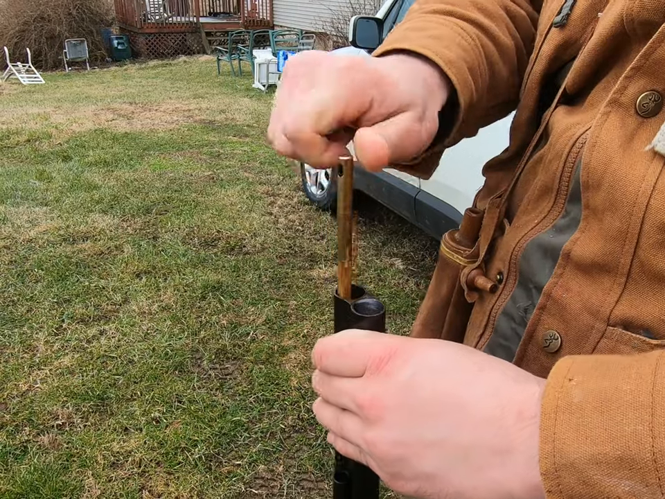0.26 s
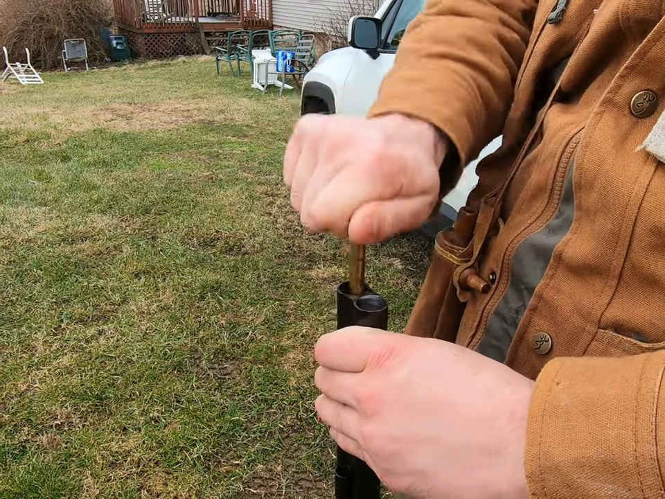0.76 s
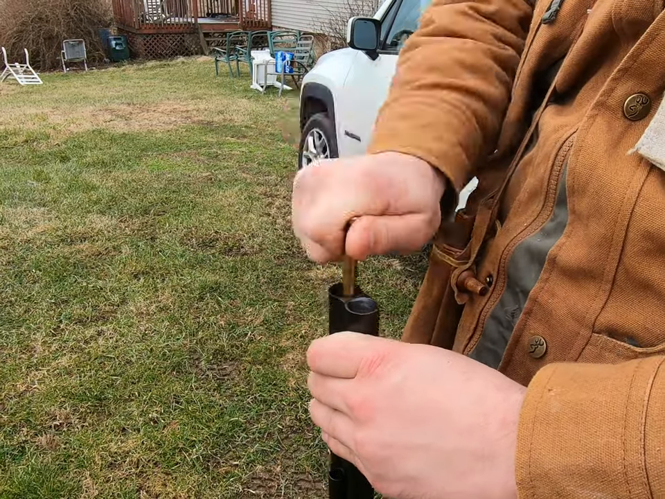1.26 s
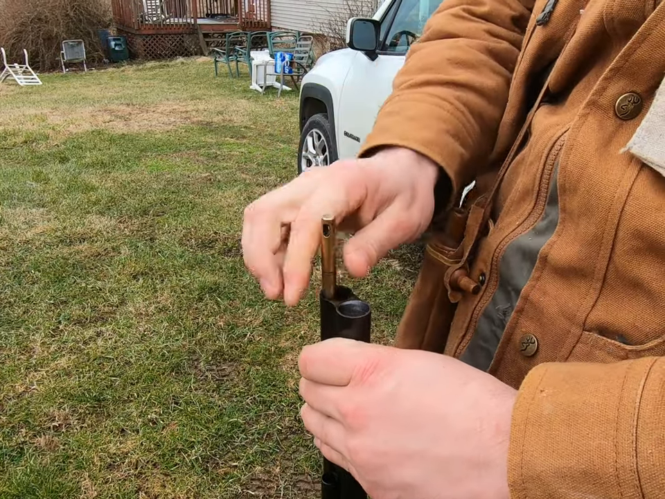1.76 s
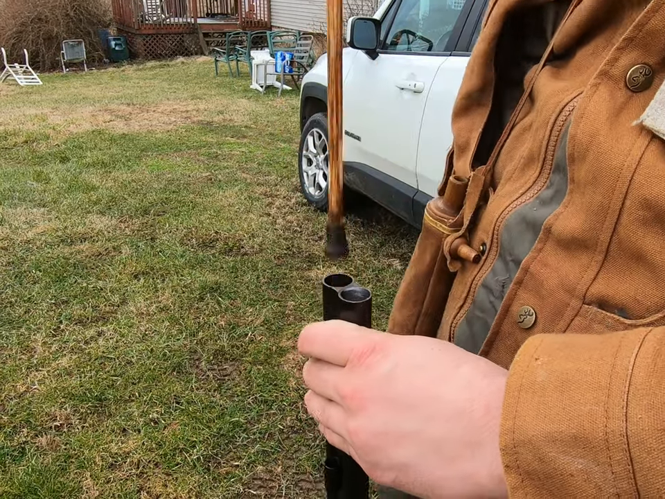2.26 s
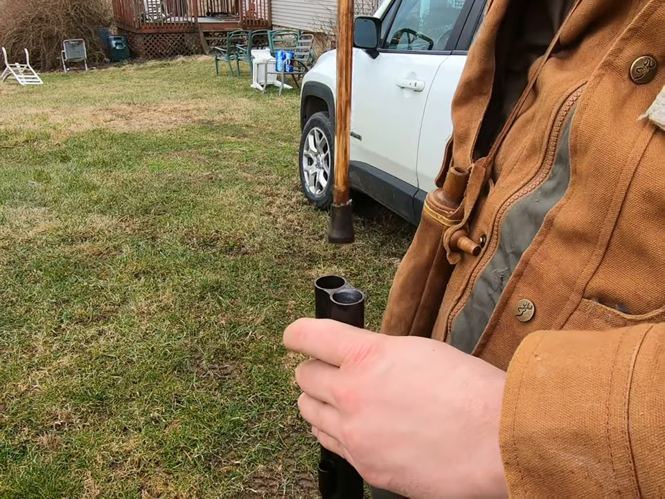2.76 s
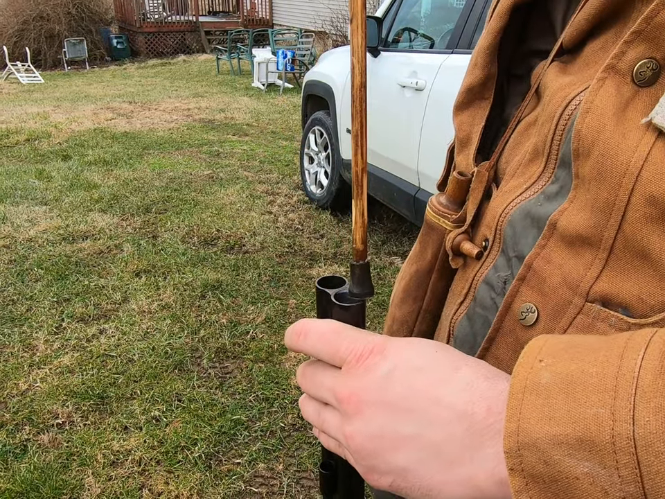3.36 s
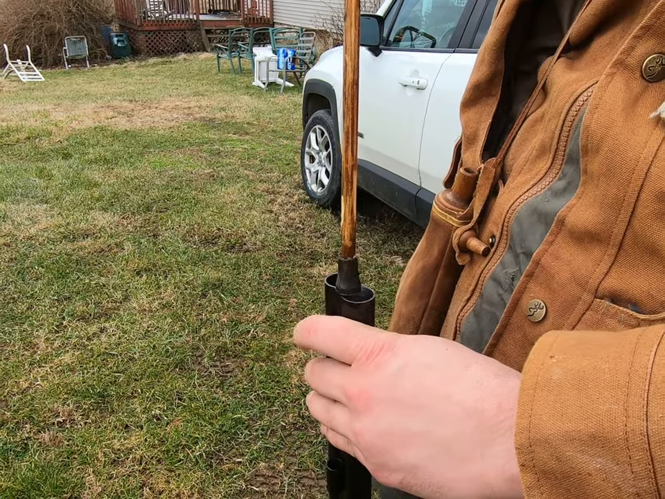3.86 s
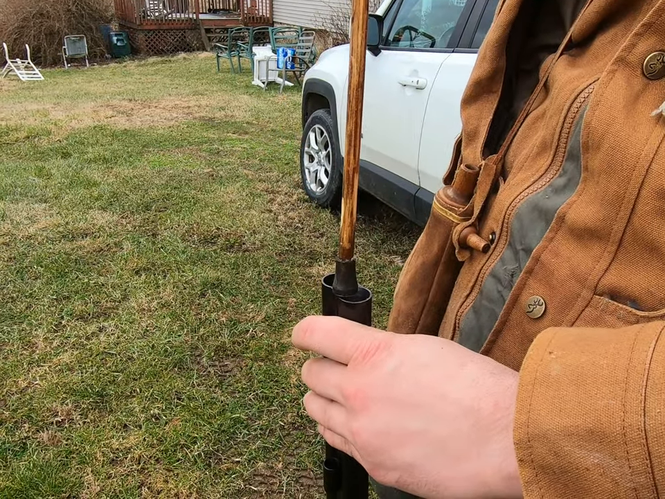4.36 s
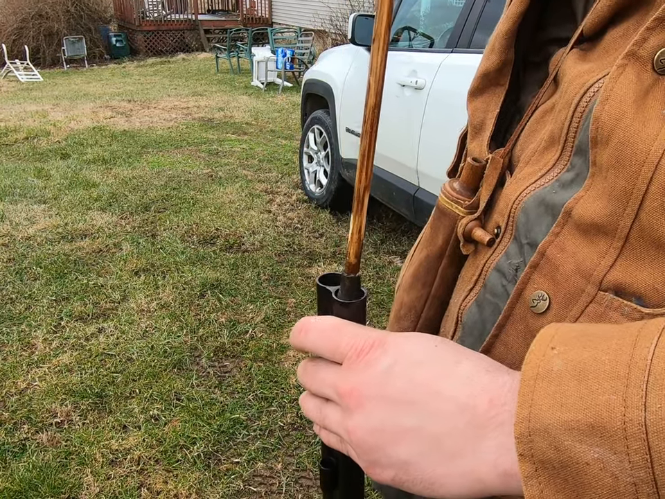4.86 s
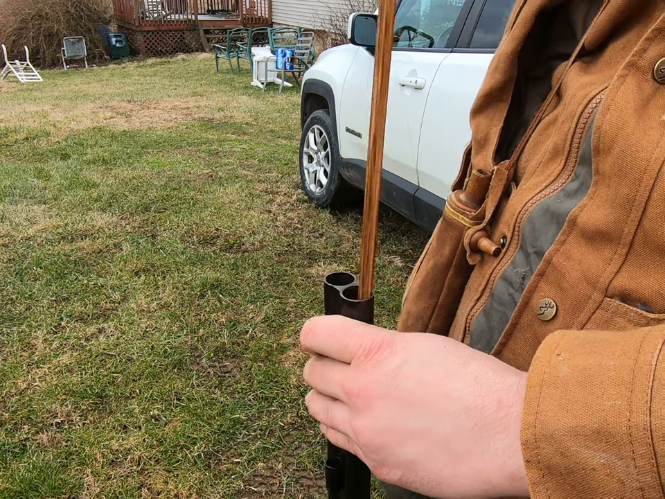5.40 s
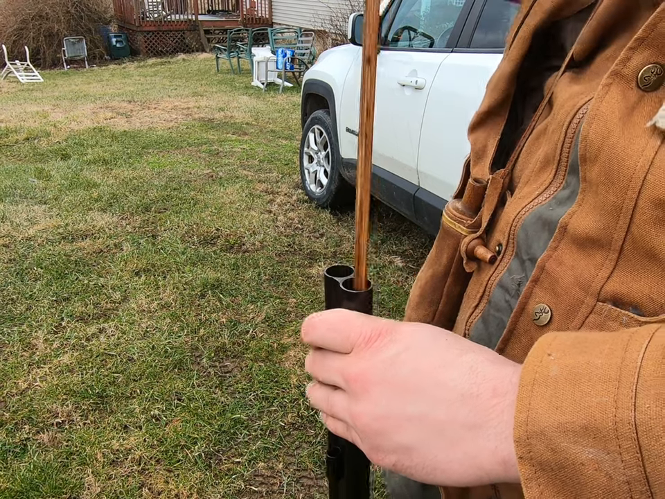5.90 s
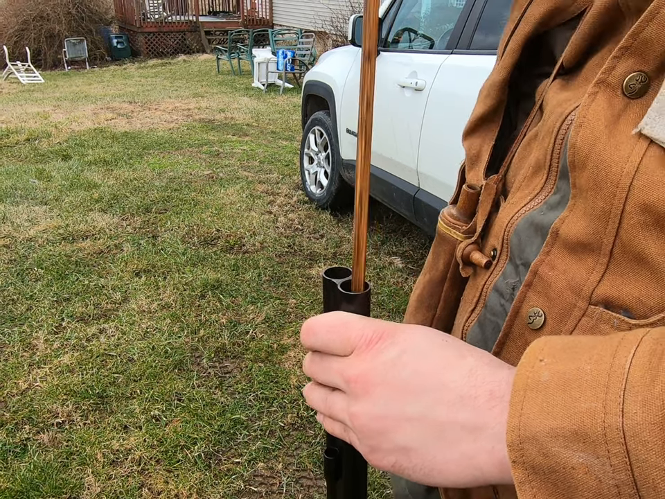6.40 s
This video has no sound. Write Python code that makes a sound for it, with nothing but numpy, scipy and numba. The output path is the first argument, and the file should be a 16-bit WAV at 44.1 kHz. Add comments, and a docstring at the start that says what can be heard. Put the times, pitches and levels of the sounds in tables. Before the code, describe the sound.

A wooden ramrod works inside a steel gun barrel, close to the microphone in a quiet yard. From the start to about 1.7 seconds it rams down in a string of hollow knocks, strongest between 0.8 and 1.4 seconds, with small low gulps of air and sharp clicks of the shaft against the muzzle. From 2 to 2.6 seconds it slides out with a light scrape, a few clicks and a soft canvas sleeve rustle. A quieter stretch follows, with light hollow taps on the rim around 3.4 to 3.9 seconds and again near 4.9. From 5.2 seconds until the end, near 6.7, the rod scrubs quickly up and down the second barrel, rasping, clicking and knocking, with a pipe-like tone that drops on each push and rises on each pull. Faint distant traffic hums underneath, and a small wind puff rumbles around 5 seconds.

```python
"""A wooden ramrod is worked in a double-barrelled muzzle-loader, close by, in a quiet yard.
First it rams the load home in one bore: knocks, gulps of air, the shaft clicking on the muzzle.
It rattles out by 2.6 s, taps the rim from 3.4 s, then scrubs up and down the other bore from 5.2 s.
The air above the rod's head rings as a pipe closed at one end, so its pitch slides with each stroke.
Behind it: a canvas sleeve, far traffic, puffs of wind."""
import sys
import numpy as np
from scipy import signal
from scipy.fft import rfft, irfft, next_fast_len
from scipy.io import wavfile
from scipy.ndimage import uniform_filter1d
from numba import njit

SR = 44100
rng = np.random.default_rng(int(sys.argv[2]) if len(sys.argv) > 2 else 0)


def waveform_to_disk(signal):
    """Save audio, clipped to [-1, 1], as 16-bit WAV at the path in sys.argv[1]."""
    frames = np.transpose(np.atleast_2d(signal))
    scaled = np.clip(frames, -1, 1) * 32767
    samples = np.round(scaled).astype(np.int16)
    wavfile.write(sys.argv[1], SR, samples)


N = 292824
T = np.arange(N) / SR

LOAD_M = .665  # seated load, below the muzzle
# Hand strokes, rest to rest. Each row: start in seconds, end in seconds, target depth in m, rub in dB.
STROKES = [(0.014, 0.149, 0.63, -48.5), (0.112, 0.286, 0.64, -55), (0.744, .88, LOAD_M, -51.5),
           (0.864, 1.06, LOAD_M, -55.5), (1.07, 1.24, LOAD_M, -49.5), (1.33, 1.51, LOAD_M, -53.5),
           (2.042, 2.428, 0.32, -43), (2.41, 2.599, 0.0061, -72), (5.153, 5.23, .021, -41.5),
           (5.19, 5.315, 0.088, -35), (5.34, 5.46, 0.044, -63), (5.462, 5.619, 0.24, -35.5),
           (5.618, 5.749, 0.12, -20), (5.746, 5.888, .33, -35), (5.889, 6.038, .181, -25),
           (6.029, 6.174, .365, -40), (6.159, 6.305, 0.16, -29), (6.31, 6.442, .399, -38),
           (6.435, 6.567, 0.2, -29), (6.582, 6.687, 0.34, -34)]


def knocks(crack_t60_s=.022, stock_t60_s=.037, chatter_db=-13, crack_db=-3, stock_db=-5,
           rebound_s_per_m=.005, rebound_db=-14):
    """Each blow cracks through the wooden stock and shoves the bore's air, which booms in odd harmonics."""
    # Each row: start in seconds, crack in dB, air push in dB, treble in dB, push length in seconds.
    blows = [(.0005, -41.5, -40.5, 5.5, 0.0045), (.0927, -22.5, -28.5, -17, 0.0047),
             (.3864, -32.5, -44.5, 2.5, 0.007), (.8447, -18.5, -31, -3.5, 0.0021),
             (.861, -24.5, -19, -11, 0.0062), (1.1094, -18, -23.5, -4, 0.005),
             (1.3749, -16.5, -25.5, -4, 0.0049), (1.619, -21, -34, 1.5, 0.003),
             (5.5239, -18, -39, -7.5, 0.0022), (5.6317, -25.5, -43, -1, 0.0028),
             (5.652, -31, -51.5, -12, .0023), (5.6854, -54, -82, -15, 0.0017),
             (5.6978, -31, -73, -33, .002), (5.7076, -32, -81, -23, .002), (5.7619, -26.5, -73, -5, 0.0028),
             (5.8065, -31, -56, -2, 0.0021), (5.8444, -30.5, -60, -22, 0.0023),
             (5.9684, -23, -50, -14, 0.002247), (6.0799, -31.5, -52.5, -21, 0.0019),
             (6.2304, -23, -53, -26, 0.00098), (6.245, -22.5, -67, -7, .002),
             (6.2698, -24.5, -73, -0.5, 0.0025), (6.3141, -29, -38.5, -11, 0.0027),
             (6.3579, -30, -50, -14, 0.0048), (6.5161, -22, -43.5, -45, .002),
             (6.615, -21, -33.5, -76, 0.0035)]
    # Crack spectrum. Each row: frequency in Hz, gain in dB.
    crack_eq = [(100, -16.5), (380, -20), (650, -7), (1150, -2), (1800, 2), (2700, 1), (4000, 5.5),
                (5500, -6), (8000, -13.5), (12000, -22), (16000, -43)]
    inside, outside = np.zeros((2, N))
    t = np.arange(4096) / SR
    decays = fade(t, np.array([[crack_t60_s], [stock_t60_s]]))
    for s, db, push_db, treble_db, push_s in blows:
        # a shorter push moves the same air but reaches higher harmonics
        push = np.sin(np.pi * np.minimum(t / push_s, 1)) ** 2 * .004 / push_s
        push = colour(push, [(20, -9), (70, -2.5), (120, 10)])
        forces = (t == 0) + undb(chatter_db) * rng.standard_normal((2, len(t))) * decays
        crack, stock = (brighten(colour(force, crack_eq), treble_db) for force in forces)
        gain = undb(db) / onset_rms(crack)
        add(inside, s, gain * undb(crack_db) * crack + undb(push_db) * push)
        add(outside, s, gain * undb(stock_db) * stock)
        # the head bounces once, later the deeper it is
        rebound = brighten(crack, db=21)
        rebound *= undb(db + crack_db + rebound_db) / onset_rms(rebound)
        add(inside, s + rebound_s_per_m * depth_m(s), rebound)
    return bore(inside, reflection=.9, lowpass=.27) + outside


def taps(trim_db=-1, click_t60_s=.036, contact_s=.0001):
    """The shaft clicks on the muzzle; clear of the bore, the head taps the rim and rings hollower."""
    # Each row: start in seconds, level in dB, treble over middle in dB.
    shaft_taps = [(0.013, -41, -15), (0.177, -30.5, -18), (.254, -44, -15), (.373, -38, -16),
                  (.397, -41, -2), (0.424, -43.5, -11), (.54, -44.5, -50), (.673, -48.5, -21),
                  (.728, -37.5, -27), (0.857, -23.5, 35), (0.883, -25.5, -1), (0.935, -36, -6),
                  (1.038, -27, -6.5), (1.047, -39.5, -3.5), (1.056, -29.5, -8), (1.185, -29.5, -1),
                  (1.194, -31, -15), (1.249, -42, -1), (1.284, -32, -14), (1.29, -49, 3.5),
                  (1.406, -27.5, 8.5), (1.445, -29.5, -11), (1.484, -41, 4), (1.526, -32.5, 3),
                  (1.647, -35.5, 4), (1.698, -51, 16), (1.787, -39.5, -2.5), (1.83, -47.5, -9),
                  (1.903, -41.5, 1), (1.946, -39.5, -1.5), (2.056, -44.5, -15), (2.086, -28.5, -4),
                  (2.278, -31.5, -4), (2.356, -30, -4.5), (5.437, -32.5, 0), (6.333, -24.5, -11.5),
                  (6.549, -32, 11)]
    # Each row: start in seconds, level in dB, treble over middle in dB, an unused value.
    rim_taps = [(3.379, -43.5, -24.5, 3100), (3.671, -28.5, -13, 2100), (3.85, -44.5, -30, 2200),
                (3.97, -58.5, -25.5, 2800), (4.063, -66.5, -3, 4500), (4.801, -39.5, -19.5, 2970),
                (4.884, -46.5, -19, 1000), (4.92, -30, -27, 1000)]
    # Click spectrum. Each row: frequency in Hz, gain in dB.
    click_eq = [(200, -15), (600, -17), (1200, -7.5), (2500, -2.5), (4200, 1.5), (6000, -12.5), (8500, -9),
                (12000, -24.5), (16000, -42.5)]
    # Hollow tone of the free rod, shared by all rim taps. Each row: frequency in Hz, gain in dB.
    free_rod_eq = [(400, -3), (720, 9), (1050, 7), (2200, 3), (4200, 2.5), (8000, -2.5), (12000, -2)]
    out, t = np.zeros(N), np.arange(6000) / SR

    def strike(treble_db):
        """One contact: a dry tick and a short ring."""
        click = colour(rng.standard_normal(len(t)) * fade(t, click_t60_s), click_eq)
        hit = (shaft_ring() + unit(click)) * (1 - np.exp(-t / contact_s))
        shelf_db = max(.61 * (treble_db + 9), -9)
        return brighten(hit, shelf_db, low_hz=4200, high_hz=7500)

    for s, db, treble_db in shaft_taps + rattle():
        hit = strike(treble_db)
        add(out, s, undb(db + trim_db) * hit / onset_rms(hit))
    for s, db, treble_db, _ in rim_taps:
        hit = colour(strike(treble_db), free_rod_eq)
        add(out, s, undb(db + trim_db) * hit / onset_rms(hit))
    return out


def rattle(count=9, first_s=.65, last_s=2.1, db=-50.5, spread_db=2, treble_db=-11.5):
    """Tap rows for the rod loose in the first bore: one faint tick at random per time slice."""
    times = first_s + (last_s - first_s) * (np.arange(count) + rng.random(count)) / count
    return [(s, db + spread_db * z, treble_db) for s, z in zip(times, rng.standard_normal(count))]


def shaft_ring(t60_scale=1, scatter_db=3):
    """The shaft rings against the steel, rms 1; each contact point favours other modes."""
    # Each row: frequency in Hz, level in dB, t60 in seconds.
    shaft_modes = [(824, -6, .055), (996, -11, .07), (1324, -16, .07), (1464, -8, .047), (1760, -12, .04),
                   (2116, 2, .06), (2374, -9, .048), (2875, -8, .05), (3079, -2, .06), (3450, -6, .05),
                   (4091, 0, .04), (4350, -7, .04), (5000, -10, .035), (5566, -6, .048), (5846, -9, .037),
                   (6130, -10, .04), (7230, -12, .037), (7690, -9, .025), (8430, -11, .035),
                   (9776, -18, .04), (11200, -17, .04)]
    t = np.arange(6000) / SR
    hz, db, t60_s = np.transpose(shaft_modes)[:, :, None]
    scatter, detune, polarity = rng.standard_normal((3, len(shaft_modes), 1))
    tones = np.sign(polarity) * np.sin(2 * np.pi * hz * (1 + .0075 * detune) * t)
    return unit(np.sum(undb(db + scatter_db * scatter) * fade(t, t60_s * t60_scale) * tones, axis=0))


def scrape(steel_db=-6, shaft_db=-9, column_db=-3.5, muzzle_db=2, muzzle_m=.0426):
    """The head's scraping comes through the steel, rings the shaft and climbs the air column."""
    steel_rub = colour(friction(), [(400, -22.5), (1400, -1)])
    column_rub = friction()
    steel, inside, airflow = np.zeros((3, N))
    for start_s, end_s, target_m, rub_db in STROKES:
        db = rub_db + stroke_db(start_s, end_s, pushing=target_m > depth_m(start_s))
        hiss_db = min(.7 * (-18.5 - rub_db), 13)  # a light rub hisses, a heavy one is duller
        steel += undb(db) * brighten(steel_rub, hiss_db, low_hz=4170, high_hz=9800)
        inside += undb(db) * column_rub
        airflow = np.maximum(airflow, undb(.27 * (db + 53.5)))
    inside *= undb(muzzle_db * np.exp(-depth_m(T) / muzzle_m))  # a short column rings harder
    ring = colour(shaft_ring(t60_scale=.16), [(4000, -5), (7000, -23)])
    shaft = signal.fftconvolve(steel, ring / np.sqrt(len(ring)))[:N]
    column = bore(colour(inside, [(3500, 0), (8000, -8)]), reflection=.87, lowpass=.6)
    return undb(steel_db) * steel + undb(shaft_db) * shaft + undb(column_db) * column + moan(airflow)


def friction(slips_per_s=1500, hiss_db=-7, catches_per_s=60, catch_s=.0044, catch_db=6):
    """Dense tiny slips that judder, with brief scratches where the head catches; rms 1."""
    slips = (rng.random(N) < slips_per_s / SR) * rng.choice([-1, 1], N)
    slips = slips * undb(3.5 * np.minimum(rng.exponential(size=N), 5))
    # Scrape spectrum. Each row: frequency in Hz, gain in dB.
    scrape_eq = [(100, -28), (400, -16.5), (900, -9), (1800, -1.5), (3200, 3.5), (4500, 5), (7000, -5),
                 (8800, -14), (12500, -32.5), (16000, -42)]
    grain = unit(colour(unit(slips) + undb(hiss_db) * rng.standard_normal(N), scrape_eq))
    catches = (rng.random(N) < catches_per_s / SR) * rng.random(N) * undb(catch_db)
    pressure = 1 + signal.lfilter([1], [1, -np.exp(-1 / (catch_s * SR))], catches)
    return unit(grain * pressure * undb(3 * walk(300) + 2 * walk(60)))


def stroke_db(start_s, end_s, pushing):
    """Rubbing follows a power of the speed; it eases along a push and tightens along a pull."""
    done = progress(T, start_s, end_s)
    power, trend_db = (1, -7.5) if pushing else (1.56, 3)
    return power * 20 * np.log10(np.sin(np.pi * done) + 1e-9) + trend_db * (done - .5)


def depth_m(t, initial_m=.64, least_m=.015):
    """Air length above the rod's head; each stroke speeds up and slows like a swing."""
    metres = previous_m = initial_m
    for start_s, end_s, target_m, _ in STROKES:
        metres = metres + (target_m - previous_m) * np.sin(np.pi / 2 * progress(t, start_s, end_s)) ** 2
        previous_m = target_m
    return np.maximum(metres, least_m)


def bore_hz(sound_m_per_s=343):
    """Quarter-wave pitch of the air column."""
    return sound_m_per_s / (4 * depth_m(T))


def bore(x, reflection, lowpass):
    """Ring x in the air column, whose length follows the rod's head."""
    filter_lag = (1 - lowpass) / lowpass
    round_trip = SR / (2 * bore_hz()) - filter_lag
    return pipe(x, np.maximum(round_trip, 2.), reflection, lowpass)


@njit
def pipe(x, lag_samples, reflection, lowpass):
    """A wave runs down the bore and back, inverted and dulled at the open end."""
    y, returned = np.zeros(len(x)), 0.
    for i in range(len(x)):
        at = i - lag_samples[i]
        if at > 0:
            k = int(at)
            returned += lowpass * (y[k] + (at - k) * (y[k + 1] - y[k]) - returned)
        y[i] = x[i] - reflection * returned + 1e-18
    return y


def gulps(drop_s=.0023, attack_s=.0018, puff_db=-14, puff_t60_s=.066):
    """Air slips past the rod's head: a dull puff and a low note that drops quickly."""
    # Each row: start in seconds, first pitch in Hz, last pitch in Hz, level in dB, t60 in seconds.
    notes = [(0.203, 326, 117.5, -20.5, 0.22), (0.9224, 504, 375.6, -24, .035),
             (6.283, 286, 102.9, -21.5, 0.034), (6.532, 241.6, 94, -17, .085)]
    out, t = np.zeros(N), np.arange(SR // 2) / SR
    puff = undb(puff_db) * band(150, 500)[-len(t):] * fade(t, puff_t60_s)
    for s, first_hz, last_hz, db, t60_s in notes:
        hz = last_hz + (first_hz - last_hz) * np.exp(-t / drop_s)
        note = fade(t, t60_s) * np.sin(2 * np.pi * np.cumsum(hz) / SR)
        add(out, s, undb(db) * (note + puff) * (1 - np.exp(-t / attack_s)))
    return out


def moan(airflow, gain_db=-50, waver_db=4):
    """Displaced air sounds the second bore's lowest note from stroke to stroke."""
    second_bore = np.interp(T, [5.51, 5.53], [0, 1])
    envelope = uniform_filter1d(airflow, SR // 25) * second_bore
    hz = bore_hz() * (1 + .05 * walk(300))
    return envelope * undb(gain_db + waver_db * walk(90)) * np.sin(2 * np.pi * np.cumsum(hz) / SR)


def sleeve(flicker_db=2, weave_db=3):
    """Canvas rubs on canvas as the arm works, catching on its coarse weave."""
    # Canvas spectrum. Each row: frequency in Hz, gain in dB.
    canvas_eq = [(180, -37.5), (300, -4), (1150, -3), (2650, -5.5), (3330, -7.5), (4540, -11), (7540, -13),
                 (15000, -39.5)]
    # Each row: peak time in seconds, level in dB, half-length in seconds.
    slides = [(1.5, -65, .65), (2.33, -52.5, 0.14), (4.95, -55.5, 0.047)]
    rub = unit(colour(rng.standard_normal(N) * undb(weave_db * walk(900)), canvas_eq))
    return rub * swells(slides, rest_db=-78.5) * undb(flicker_db * walk(75))


def reflections(x, near_db=-22, far_db=-35, far_t60_s=.35, wall_s=.11, wall_db=-38):
    """Hand and coat scatter the treble at once; the yard and a house wall answer faintly."""
    t = np.arange(SR // 2) / SR
    wall = (t > wall_s) * fade(np.abs(t - wall_s), .065)
    near = undb(near_db) * unit(fade(t, .025)) * rng.standard_normal((2, len(t)))
    far_envelope = undb(far_db) * unit(fade(t, far_t60_s)) + undb(wall_db) * unit(wall)
    far = far_envelope * rng.standard_normal((2, len(t)))
    echoes = np.array([brighten(side, 13.3, low_hz=4900, high_hz=8000) for side in near]) + far
    x = colour(x, [(120, -39), (500, 11)]) / np.sqrt(len(t))
    return signal.fftconvolve(x[None], echoes, axes=1)[:, :N]


def yard(air_db=-68, hum_db=-67, side_db=-7):
    """Still air, wider in the treble, and a low hum."""
    # Air spectrum. Each row: frequency in Hz, gain in dB.
    air_eq = [(15, -47), (25, -30.5), (39, -9), (59, -10.5), (118, -23), (142, -8), (167, -10), (237, -12),
              (588, -34), (729, -20), (1460, -34), (1580, -45), (4750, -40), (7480, -38), (15000, -59)]
    mid, side = (unit(colour(rng.standard_normal(N), air_eq)) for _ in range(2))
    side = colour(side, [(200, 3.5), (2000, 9.5), (8000, 10.5)]) * undb(side_db)
    return undb(air_db) * np.array([mid + side, mid - side]) + undb(hum_db) * band(50, 61)


def traffic(drone_db=-2, growl_db=-13):
    """Far traffic drones, swelling and receding."""
    # Each row: peak time in seconds, level in dB, half-length in seconds.
    passes = [(2.2, -58, 0.31), (3.3, -58, 0.52), (5.1, -60, 0.13)]
    drone = undb(drone_db) * band(170, 210) + undb(growl_db) * band(100, 270)
    return drone * swells(passes, rest_db=-71.5)


def wind(trim_db=-1, half_s=.063):
    """Small puffs rumble on the microphone."""
    # Each row: peak time in seconds, level in dB.
    puffs = [(.1, -57), (3.56, -56), (4.38, -56.5), (4.83, -58), (5.09, -45.5), (5.25, -47.5)]
    rumble = undb(trim_db) * colour(band(22, 91), [(30, 1.5), (130, -8)])
    return rumble * swells([(s, db, half_s) for s, db in puffs], rest_db=-72)


def undb(db):
    """Decibels to gain."""
    return 10 ** (np.asarray(db) / 20)


def unit(x):
    """Scale to rms 1."""
    return x / np.sqrt(np.mean(x ** 2))


def onset_rms(x):
    """Rms about the mean over the first 4 ms."""
    return np.std(x[:SR // 250])


def add(out, s, x):
    """Mix x into out from time s on."""
    i = max(int(s * SR), 0)
    out[i:i + len(x)] += x[:max(N - i, 0)]


def along(points, hz):
    """Read (Hz, value) points on a log-frequency axis."""
    f, value = np.transpose(points)
    return np.interp(np.log(hz + 1), np.log(f), value)


def colour(x, points, size=4096):
    """Minimum-phase filter from (Hz, dB) points."""
    cepstrum = irfft(np.log(undb(along(points, np.fft.rfftfreq(size, 1 / SR)))))
    cepstrum[1:size // 2] *= 2
    cepstrum[size // 2 + 1:] = 0
    return signal.fftconvolve(x, irfft(np.exp(rfft(cepstrum))))[:len(x)]


def brighten(x, db, low_hz=3000, high_hz=9000):
    """Treble shelf."""
    return colour(x, [(low_hz, 0), (high_hz, db)], size=512)


def band(low_hz, high_hz):
    """Band noise, rms 1."""
    sos = signal.butter(2, [low_hz, high_hz], "band", fs=SR, output="sos")
    return unit(signal.sosfilt(sos, rng.standard_normal(N)))


def walk(rate_hz):
    """Random wander, spread near 1."""
    return np.interp(T * rate_hz, np.arange(4096), rng.standard_normal(4096))


def fade(t, t60_s):
    """Exponential decay, 60 dB in t60_s."""
    return np.exp(-np.log(1000) * t / t60_s)


def swells(rows, rest_db):
    """Gain of bell-shaped swells over a resting level."""
    power = sum((undb(db) * np.exp(-((T - s) / half_s) ** 2)) ** 2 for s, db, half_s in rows)
    return np.sqrt(undb(rest_db) ** 2 + power)


def progress(t, start_s, end_s):
    """Share of a stroke done, 0 to 1."""
    return np.clip((t - start_s) / (end_s - start_s), 0, 1)


def scene():
    """The gun stands straight ahead; its treble reaches the two microphone ports out of step."""
    # Phase between the ports. Each row: frequency in Hz, lead of the left in radians.
    port_phase = [(0, 0), (1980, -0.0), (2760, -0.1), (5250, 0.1), (6630, -0.3), (7670, 0.7), (9390, 3.1),
                  (9650, 2.7), (10700, 6.3), (11100, 6.5), (13600, 5.9), (14100, 4.7), (14400, 6.1),
                  (16000, 6.0)]
    # Rod position. Each row: time in seconds, left minus right in dB.
    sway = [(3.3, .2), (3.6, -2), (4.95, -2), (5.2, .5)]
    gun = knocks() + taps() + gulps() + scrape() + sleeve()
    size, sides = next_fast_len(N + SR), np.array([[.5], [-.5]])
    lead_rad = along(port_phase, np.fft.rfftfreq(size, 1 / SR))
    direct = irfft(rfft(gun, size) * np.exp(1j * lead_rad * sides), size)[:, :N]
    balance = undb(np.interp(T, *np.transpose(sway)) * sides)
    return direct * balance + reflections(gun) + yard() + traffic() + wind()


def record(dry):
    """Steep low-pass at 16 kHz."""
    return signal.sosfilt(signal.ellip(8, .2, 70, 16000, fs=SR, output="sos"), dry)


dry = scene()
out = record(dry)
waveform_to_disk(out)
```